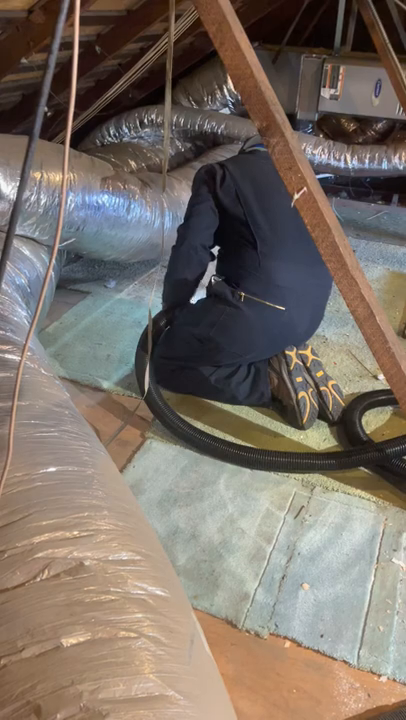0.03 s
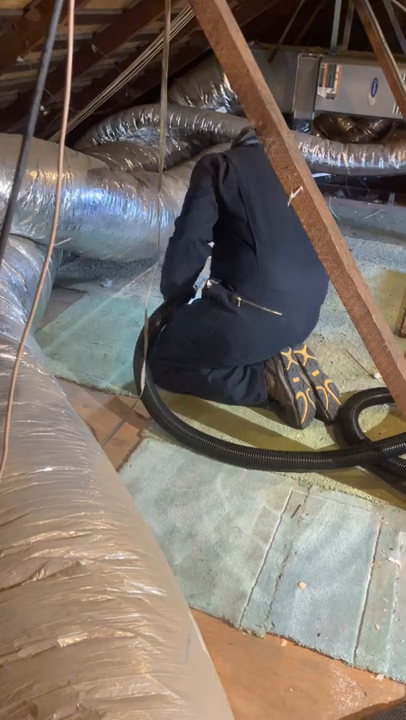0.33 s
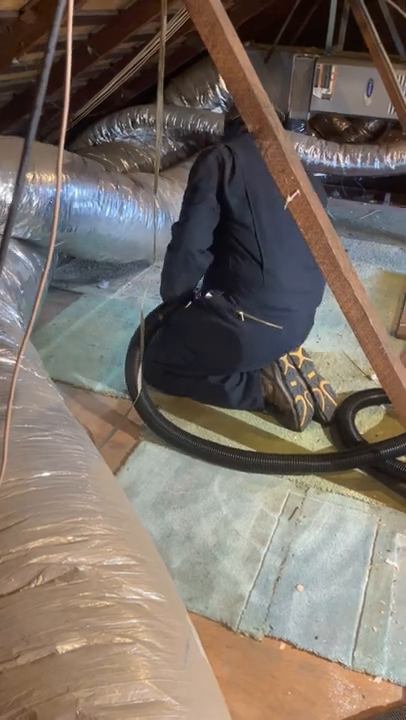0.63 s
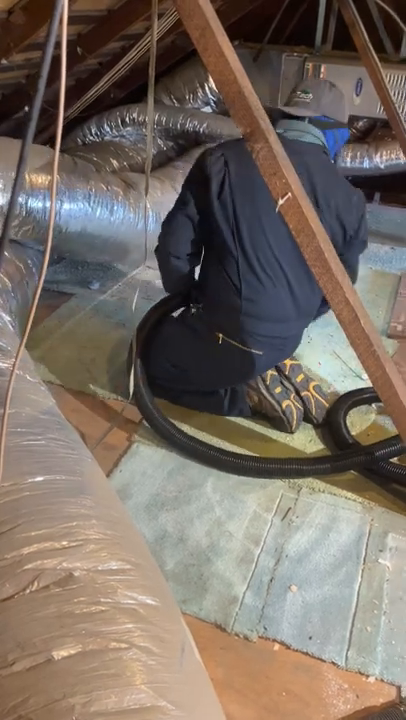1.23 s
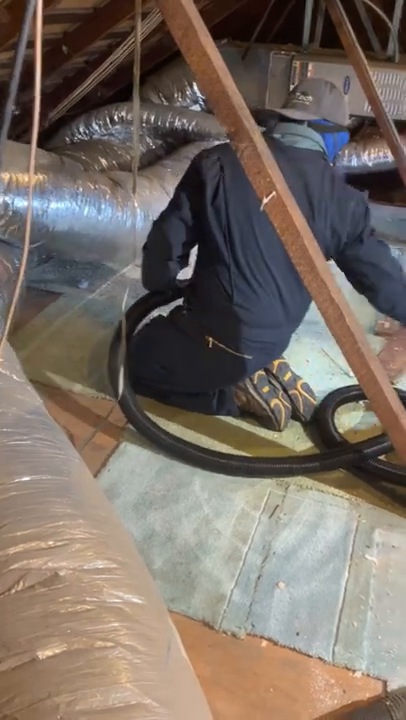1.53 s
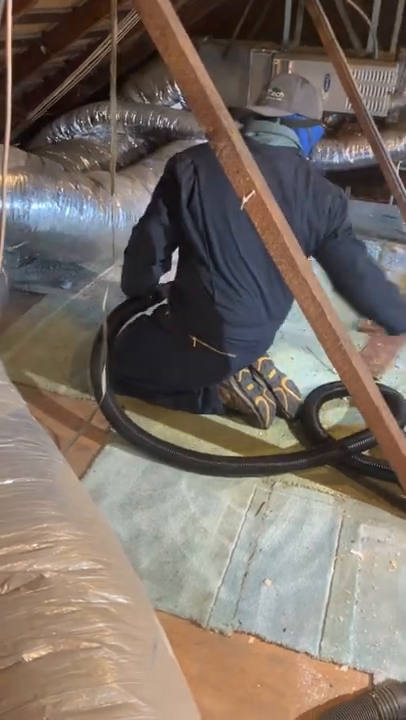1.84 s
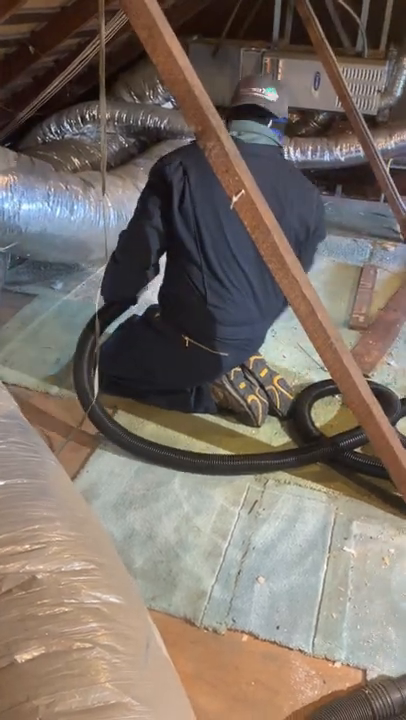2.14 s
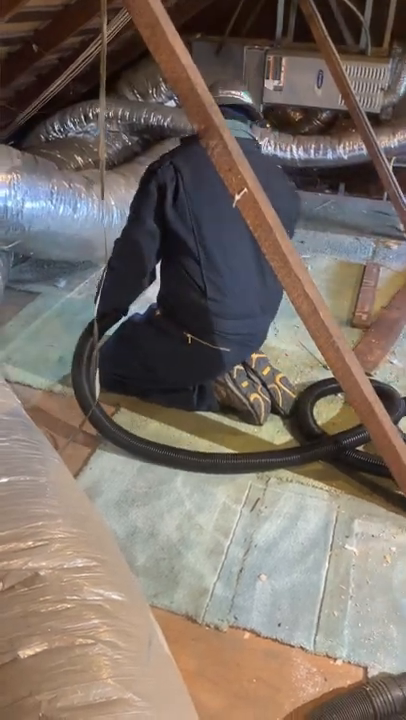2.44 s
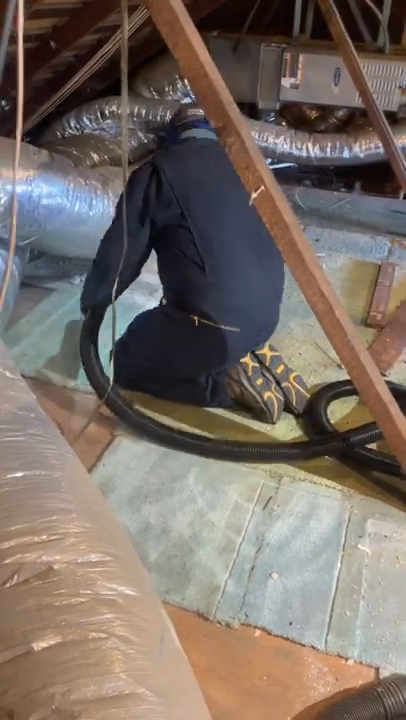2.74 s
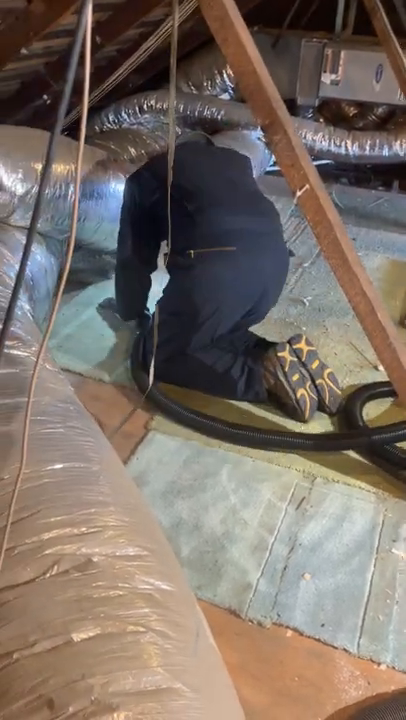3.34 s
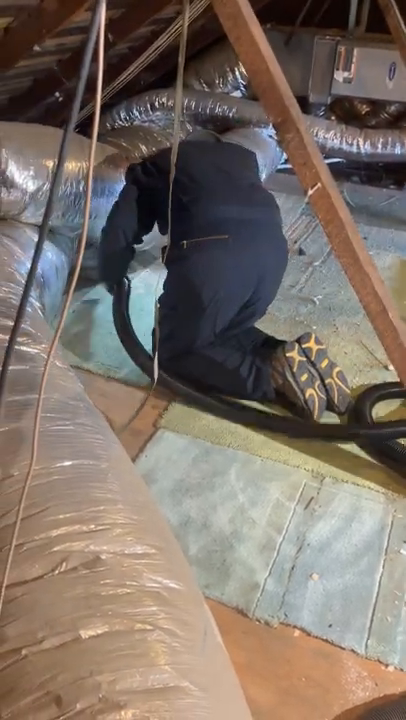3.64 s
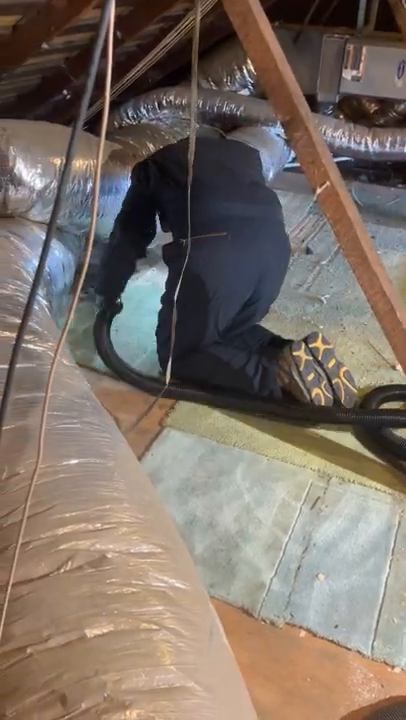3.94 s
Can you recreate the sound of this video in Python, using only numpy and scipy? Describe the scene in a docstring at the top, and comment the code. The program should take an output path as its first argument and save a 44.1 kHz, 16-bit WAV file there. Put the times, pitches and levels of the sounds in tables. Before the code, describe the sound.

Loud, steady vacuum motor hum and suction noise, with a few dull hose bumps.

```python
"""In an attic, an insulation vacuum drones: two five-bladed rotors run at nearly the same speed,
so their hums beat. Air rushes through the hose; when the nozzle bites into the insulation, the main
rotor speeds up and fibres hiss in. A few dull knocks sound on the floor as the hose is moved.
A phone with two microphone ports hears it all."""
import sys
import numpy as np
from scipy import signal
from scipy.fft import rfft, irfft
from scipy.io import wavfile
from scipy.ndimage import uniform_filter1d

SR = 44100
rng = np.random.default_rng(int(sys.argv[2]) if len(sys.argv) > 2 else 0)


def store_wav(level_fs):
    """Save 16-bit WAV to argv[1]."""
    pcm = np.round(np.clip(np.atleast_2d(level_fs), -1, 1) * 32767)
    wavfile.write(sys.argv[1], SR, pcm.T.astype(np.int16))


N = 176400
TIME = np.arange(N) / SR
BIN_HZ = np.fft.rfftfreq(N, 1 / SR)


def undb(db):
    """Decibels to gain."""
    return 10 ** (np.asarray(db) / 20)


def automation(rows):
    """One lane per value column of a time table, in straight ramps."""
    times, *columns = np.array(rows, float).T
    return [np.interp(TIME, times, column) for column in columns]


def across_bins(rows):
    """A frequency table drawn over the spectrum on a log axis."""
    hz, value = np.array(rows, float).T
    return np.interp(np.log(BIN_HZ + 1), np.log(hz + 1), value)


def wobble(per_s):
    """A smooth random modulator with a spread of 1."""
    hold = max(int(SR / per_s), 2)
    steps = np.repeat(rng.standard_normal(N // hold + 3), hold)
    smooth = uniform_filter1d(uniform_filter1d(steps, hold), hold)[rng.integers(hold):][:N]
    return smooth / smooth.std()


def tone(phase, db):
    """A sine at a given rms level."""
    return np.sqrt(2) * undb(db) * np.sin(phase)


def partials(phase, table, load, wander_db, per_s, jitter_rad):
    """Wavering multiples of a rotation; the load fades each from its free to its choked level."""
    out = 0
    for multiple, free_db, choked_db in table:
        db = free_db + (choked_db - free_db) * load + wander_db * wobble(per_s)
        out += tone(multiple * phase + jitter_rad * wobble(2 * per_s), db)
    return out


# Right port's delay behind the left: f/Hz, lag/rad
STEREO_LAG = [(120, 0), (305, .26), (700, .6), (920, .7), (1220, -.42), (1530, .38), (1900, 0), (2150, .75),
              (2700, 1.8), (3100, 1.8), (3500, .2), (4000, .2), (4650, 1.9), (5250, 5.2), (6000, 6.3),
              (8300, 8.8), (9600, 9.9), (11500, 11.7), (12000, 12.5), (13700, 12.6), (15000, 14.7)]
# Pan by frequency: f/Hz, left minus right/dB
STEREO_BALANCE = [(320, 0), (700, 2.7), (1300, 2.8), (2100, -1), (3300, 3.5), (4300, 1.8), (5000, -1.5),
                  (5800, 0)]
def ports(left, right):
    """Two spectra become stereo sound, with the lag and balance of the microphone ports."""
    lag = np.interp(BIN_HZ, *np.array(STEREO_LAG).T)
    lean = undb(across_bins(STEREO_BALANCE) / 2)
    return irfft(np.array([left * lean, right / lean * np.exp(-1j * lag)]), N)


# How alike noise is at the two ports: f/Hz, coherence/0-1
STEREO_COHERENCE = [(400, .99), (750, .72), (1100, .85), (1700, .92), (2400, .58), (3200, .3), (3800, .6),
                    (5000, .72), (6000, .9), (12000, .93)]
def turbulence(colour):
    """Coloured noise, partly shared by the two ports, which gives it width."""
    shared, apart = rfft(rng.standard_normal((2, N))) * np.sqrt(SR / 2) * undb(across_bins(colour))
    alike = across_bins(STEREO_COHERENCE)
    return ports(shared, alike * shared + np.sqrt(1 - alike ** 2) * apart)


# Bumps as the hose is moved: t/s, level/dB, contact/s, tilt about 100 Hz/(dB per octave)
HOSE_BUMPS = [(.101, -27, .005, 13), (.75, -30, 0.011, 0), (2.89, -30, 0.0059, 7), (2.924, -31, 0.0084, 6),
              (3.02, -19, 0.0086, -4), (3.891, -19, 0.0029, 1), (3.902, -17, 0.0086, -1)]
# The floor's boom: f/Hz, level/dB, t60/s
FLOOR_RING = [(70, -2.5, 0.26), (82, -4, .14), (131, 1, 0.094), (170, -1.5, .05)]
def floor_knocks():
    """Soft pushes ring the floor's low modes; each spot favours the lower or the higher ones."""
    t = TIME[:SR]
    out = 0
    for at, db, contact, tilt_db in HOSE_BUMPS:
        ring = 0
        for hz, mode_db, t60 in FLOOR_RING:
            decay = undb(mode_db + tilt_db * np.log2(hz / 100) - 60 * t / t60)
            ring += decay * np.sin(2 * np.pi * hz * t)
        push = np.sin(np.pi * np.clip((TIME - at) / contact, 0, 1)) ** 2
        out += signal.fftconvolve(undb(db) * push / push.sum(), ring)[:N]
    return out


# Base colour of the fibre hiss: f/Hz, density/(dB per Hz)
FIBRE_COLOUR = [(500, -79), (1800, -69), (3200, -68.5), (6000, -71), (11000, -74.5), (14500, -91)]
# Clumps passing the nozzle: t/s, half width/s, gain/dB, tilt about 4 kHz/(dB per octave)
CLUMPS = [(.795, .038, -1, 1.8), (.885, .05, 2.5, -.8), (1.05, .07, -.7, -.5), (1.16, .035, -2, 1.8)]
def fibre_hiss(grain_db=1.5):
    """Grainy puffs, each with its own brightness, as clumps of insulation go up the hose."""
    out = 0
    for at, width, db, tilt_db in CLUMPS:
        colour = [(hz, level + tilt_db * np.log2(hz / 4000)) for hz, level in FIBRE_COLOUR]
        swell = np.exp(-.5 * ((TIME - at) / width) ** 2)
        out += turbulence(colour) * undb(db) * swell
    return out * undb(grain_db * wobble(230))


# Colour of the air bed with the nozzle free: f/Hz, density/(dB per Hz)
AIR_COLOUR = [(20, -62), (40, -57.5), (65, -68), (110, -62), (170, -65.5), (280, -59.5), (420, -61.5),
              (640, -58.5), (800, -62), (1100, -63.5), (1600, -64), (2000, -69), (3000, -70), (4000, -73),
              (5000, -73), (6200, -72.5), (6750, -72.5), (7400, -71.5), (9200, -80), (11000, -68),
              (12000, -80), (13000, -84), (14500, -115.5)]
def air_rush(load, load_db=1.68, flutter_db=.35):
    """A bed of suction noise, a little louder under load and never quite even."""
    return turbulence(AIR_COLOUR) * undb(load_db * load + flutter_db * wobble(12))


def low_drone(hz=239.2, db=-40.5, wander_db=3.5, jitter_rad=.83):
    """A quiet tone under the hum, wavering around a steady pitch."""
    phase = 2 * np.pi * hz * TIME + jitter_rad * wobble(16)
    return tone(phase, db + wander_db * wobble(16))


def whistle(peak_s=.28, width_s=.16, hz=2167, sag_hz_per_s=60, db=-40):
    """A brief, slowly sinking whistle just above the whine, beating against it."""
    since = TIME - peak_s
    phase = 2 * np.pi * np.cumsum(hz - sag_hz_per_s * since) / SR
    return tone(phase, db) * np.exp(-(since / width_s) ** 2)


# Shaft tones: multiple of the turning rate, free level/dB, choked level/dB
SHAFT_TONES = [(3, -49, -44.5), (6, -46.5, -50), (7, -41.5, -42.5), (7.5, -46.5, -35.5), (9, -54, -70),
               (12, -55, -65)]
def shaft_growl(main_phase, blades=5):
    """Rough low tones from the turning of the main shaft."""
    return partials(main_phase / blades, SHAFT_TONES, load=nozzle_load(),
                    wander_db=3.5, per_s=16, jitter_rad=.83)


# Overtones that follow the load: multiple of the blade rate, free level/dB, choked level/dB
LOADED_OVERTONES = [(8, -51, -45.5), (10, -59, -61), (13, -51, -51), (14, -55, -47.5), (15, -59, -48.5),
                    (19, -53, -48.5), (20, -60, -59), (21, -56, -49.5), (23, -54, -65)]
# Overtones on their own faders: multiple of the blade rate -> t/s, level/dB
OVERTONE_SWELLS = {2: [(.2, -46), (.35, -35.5), (.62, -32), (.95, -41), (1.35, -33), (1.9, -45.5),
                   (2.9, -50), (3.35, -36.5), (3.65, -38), (4, -46)], 3: [(.1, -32.5), (.27, -29),
                   (.38, -39.5), (.62, -29.5), (.9, -30), (1.06, -36.5), (1.24, -28), (1.45, -37),
                   (1.7, -31), (2.4, -30), (3.0, -35.5), (3.2, -28.5), (3.4, -37), (4, -37)],
                   4: [(.1, -30.5), (.9, -36.5), (1.5, -33.5), (2.2, -31.5), (3.0, -34.5), (3.13, -28.5),
                   (3.3, -35.5), (4, -33)], 5: [(.1, -30.5), (.8, -29.5), (1.2, -27.5), (1.6, -36),
                   (2.1, -41), (2.9, -39.5), (3.5, -35), (4, -35)], 6: [(.1, -48), (.3, -44), (.55, -38.5),
                   (.95, -36), (1.32, -35), (1.55, -56), (2.9, -50), (3.35, -45), (4, -54)], 9: [(.1, -44),
                   (.4, -55), (1.4, -53), (1.65, -39), (1.95, -38.5), (2.3, -41), (4, -42)], 11: [(.1, -54),
                   (3.0, -50.5), (3.3, -48.5), (4, -45.5)], 12: [(.1, -43.5), (.28, -37.5), (.45, -41.5),
                   (.92, -40.5), (1.15, -51), (1.33, -42), (2.1, -46.5), (2.5, -44), (2.8, -46), (3.1, -51),
                   (4, -54)], 22: [(.1, -43.5), (1.0, -47), (1.4, -43), (1.6, -46.5), (2.6, -47),
                   (2.8, -43), (3.05, -42), (3.3, -45), (4, -45)]}
def blade_buzz(main_phase, per_s=5.904, jitter_rad=.56, tremble_db_per_octave=.54):
    """The main rotor's overtones; turbulence shakes the swelling ones, the highest most."""
    out = partials(main_phase, LOADED_OVERTONES, load=nozzle_load(),
                   wander_db=2.5, per_s=per_s, jitter_rad=jitter_rad)
    for multiple, levels in OVERTONE_SWELLS.items():
        tremble_db = tremble_db_per_octave * np.log2(multiple) * wobble(30)
        phase = multiple * main_phase + jitter_rad * wobble(2 * per_s)
        out += tone(phase, automation(levels)[0] + tremble_db)
    return out


# Whine faders: t/s, main level/dB, second level/dB
WHINE_LEVELS = [(.1, -42, -58), (.3, -41, -56), (.55, -47, -44), (.8, -52, -41.5), (1.12, -55, -40.5),
                (1.28, -47, -45), (1.5, -41, -41), (1.65, -35, -35.8), (1.76, -36.8, -37.4),
                (1.87, -41, -41), (2.0, -44.5, -43.5), (2.2, -47, -45), (2.37, -45, -42), (2.6, -48, -50),
                (3.0, -52, -54), (3.22, -40.5, -55), (3.6, -42, -51), (3.82, -39.5, -46.5), (4, -43, -47)]
def rotor_whine(main_phase, second_phase, multiple=7):
    """One high overtone from each rotor; the pair flutters as it beats."""
    main_db, second_db = automation(WHINE_LEVELS)
    return tone(multiple * main_phase, main_db) + tone(multiple * second_phase, second_db)


# Blade-passing pitch of each rotor: t/s, f/Hz
MAIN_PITCH = [(0.0, 306.0), (0.15, 306.2), (0.45, 308.0), (0.93, 308.9), (1.15, 310.9), (1.24, 310.6),
              (1.42, 307.2), (1.62, 305.3), (1.95, 304.1), (2.5, 303.6), (3.04, 303.8), (3.24, 305.5),
              (3.5, 304.8), (3.7, 304.7), (4.0, 304.1)]
SECOND_PITCH = [(0.0, 302.4), (0.3, 305.4), (0.65, 308.1), (0.9, 304.3), (1.2, 301.9), (1.45, 302.8),
                (1.7, 303.4), (1.8, 302.8), (2.1, 299.7), (2.35, 303.15), (2.6, 307.1), (2.9, 314.3),
                (3.15, 312.6), (3.45, 310.8), (3.7, 310.1), (4.0, 308.7)]
# Hum faders: t/s, main level/dB, second level/dB
HUM_LEVELS = [(0.1, -20, -22.5), (0.35, -16.5, -31.5), (0.8, -20, -29), (1.15, -18.5, -31.5),
              (1.45, -22.5, -32), (1.8, -27, -28.5), (2.05, -24, -27.5), (2.5, -27.5, -28),
              (2.9, -26.5, -33.5), (3.25, -23.5, -29), (3.6, -26, -26), (4.0, -28.5, -28.5)]
def rotors():
    """The lead: two blade hums a few hertz apart beat, with buzz, growl and whine locked to them."""
    main_phase = 2 * np.pi * np.cumsum(automation(MAIN_PITCH)[0]) / SR
    second_phase = 2 * np.pi * np.cumsum(automation(SECOND_PITCH)[0]) / SR
    main_db, second_db = automation(HUM_LEVELS)
    hum = tone(main_phase, main_db) + tone(second_phase, second_db)
    return hum + blade_buzz(main_phase) + shaft_growl(main_phase) + rotor_whine(main_phase, second_phase)


# How far insulation chokes the nozzle: t/s, load/0-1
NOZZLE_CHOKE = [(.1, 0.54), (.35, 1), (.8, 1), (1.25, 0.9), (1.42, 0.2), (1.6, 0.03), (2.1, 0), (3.03, 0.2),
                (3.2, 0.27), (3.5, 0.3), (4, 0)]
def nozzle_load():
    """The control lane for air, buzz and growl: one deep bite, later a light one."""
    return automation(NOZZLE_CHOKE)[0]


def scene():
    """The machine's tones in stereo, over airflow, fibres and hose handling."""
    machine = rfft(rotors() + whistle() + low_drone())
    return ports(machine, machine) + air_rush(nozzle_load()) + fibre_hiss() + floor_knocks()


def record(dry, start_s=.084, low_cut_hz=56.7, high_cut_hz=15100):
    """The phone opens abruptly and cuts the deepest bass and the top."""
    opened = dry * (TIME >= start_s)
    low_cut = signal.butter(4, low_cut_hz, "high", fs=SR, output="sos")
    high_cut = signal.ellip(8, .2, 80, high_cut_hz, fs=SR, output="sos")
    return signal.sosfilt(high_cut, signal.sosfilt(low_cut, opened))


dry = scene()
out = record(dry)
store_wav(out)
```